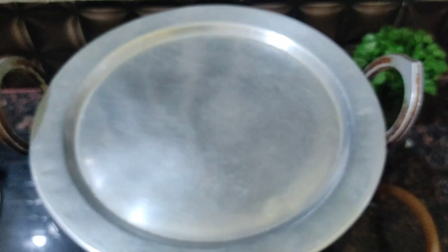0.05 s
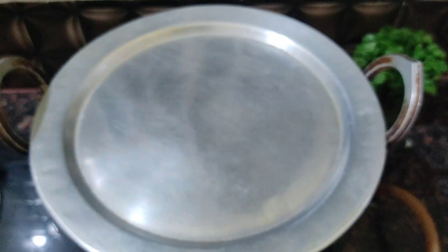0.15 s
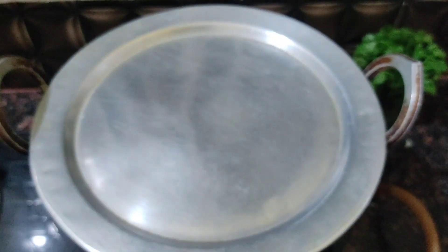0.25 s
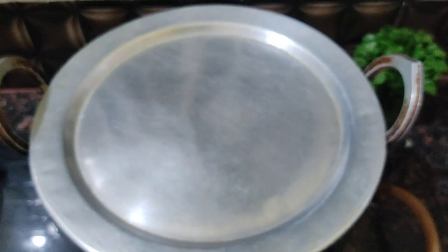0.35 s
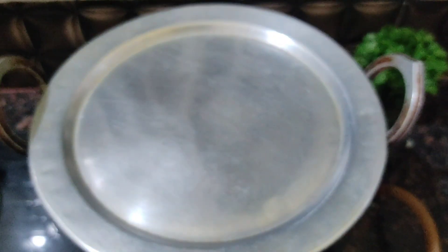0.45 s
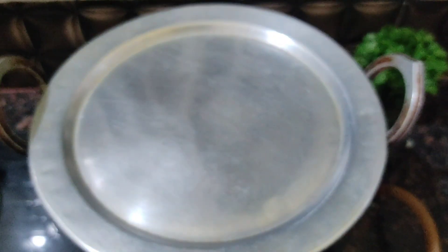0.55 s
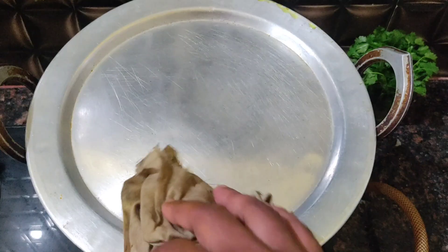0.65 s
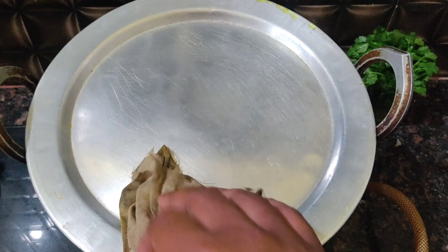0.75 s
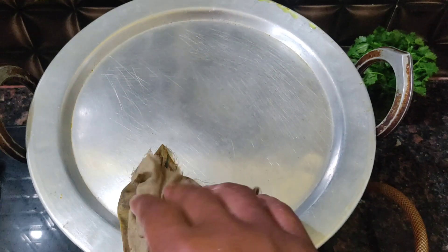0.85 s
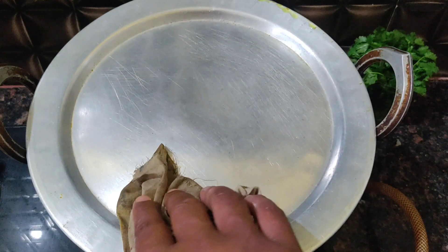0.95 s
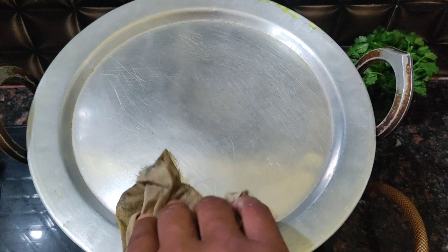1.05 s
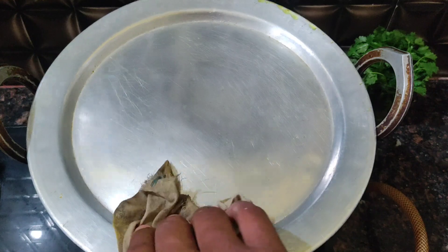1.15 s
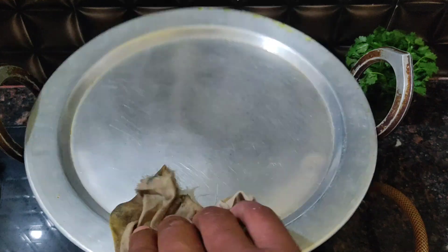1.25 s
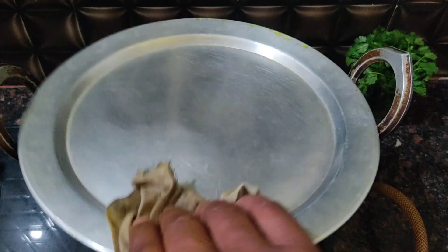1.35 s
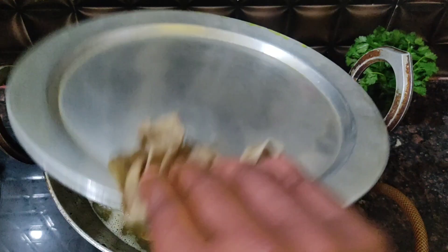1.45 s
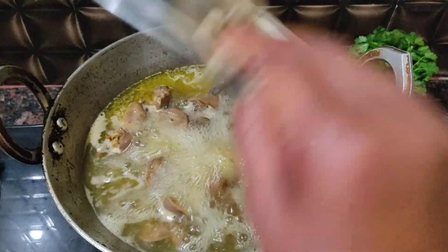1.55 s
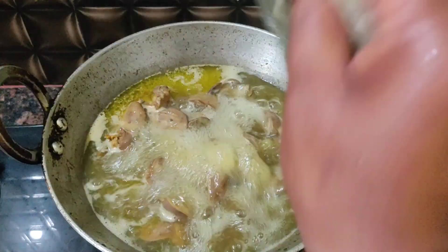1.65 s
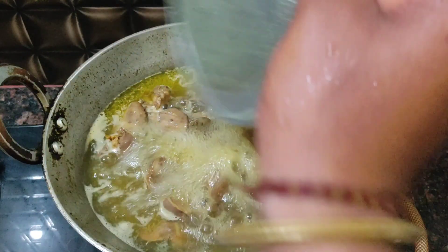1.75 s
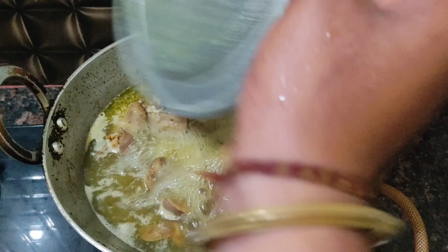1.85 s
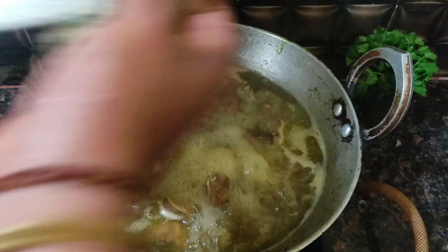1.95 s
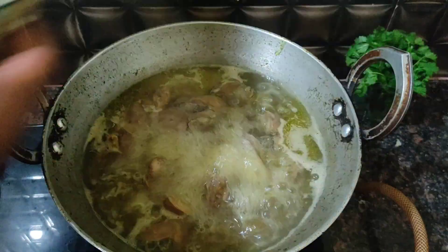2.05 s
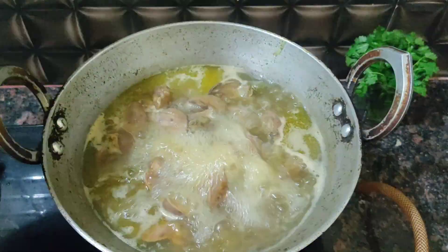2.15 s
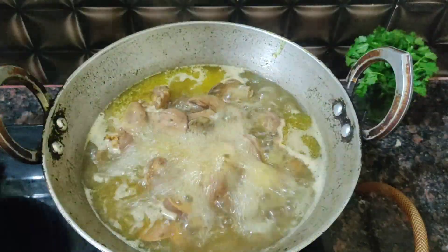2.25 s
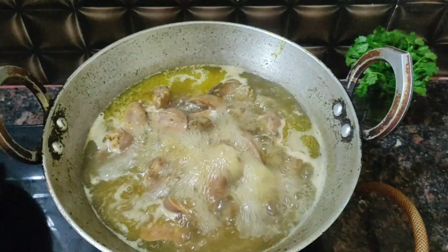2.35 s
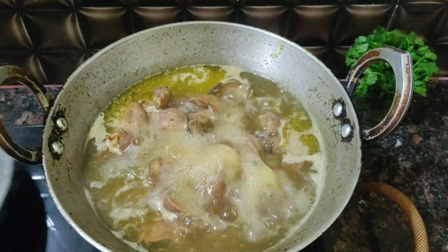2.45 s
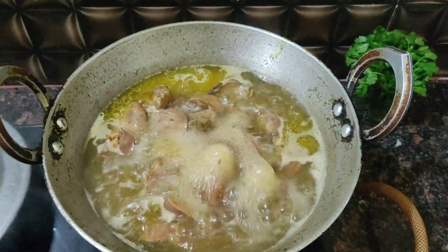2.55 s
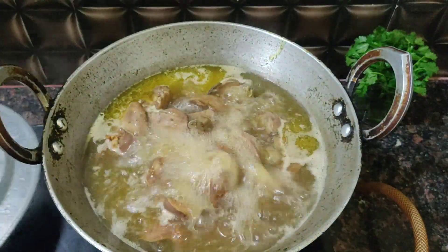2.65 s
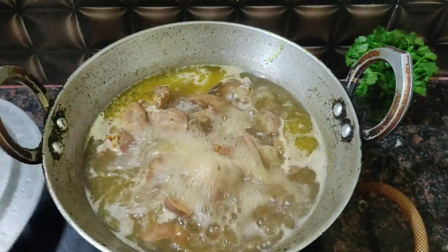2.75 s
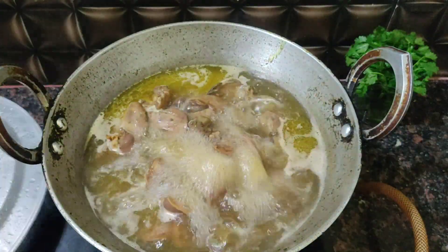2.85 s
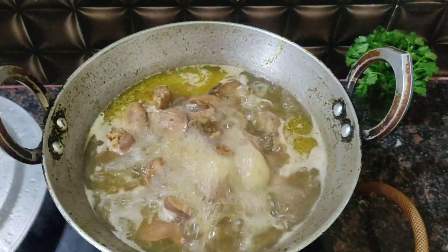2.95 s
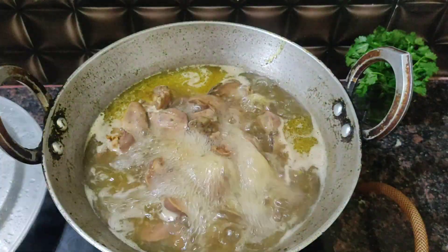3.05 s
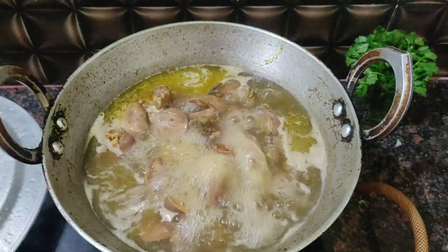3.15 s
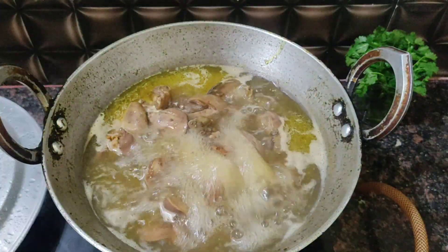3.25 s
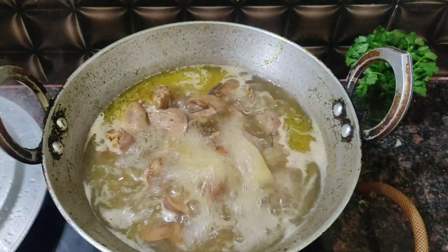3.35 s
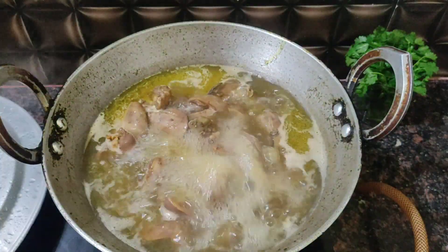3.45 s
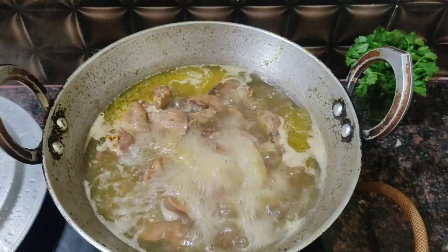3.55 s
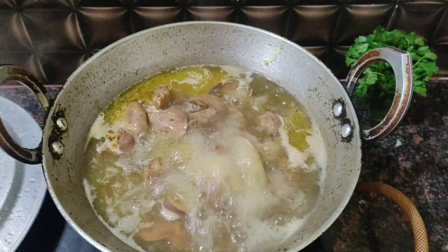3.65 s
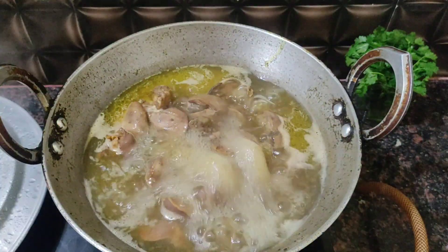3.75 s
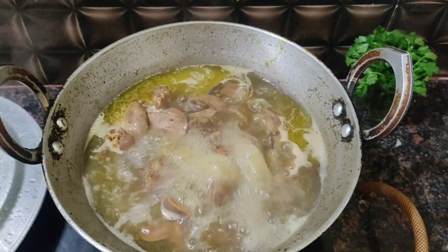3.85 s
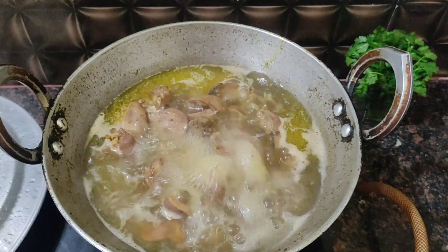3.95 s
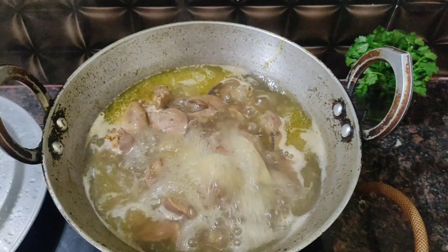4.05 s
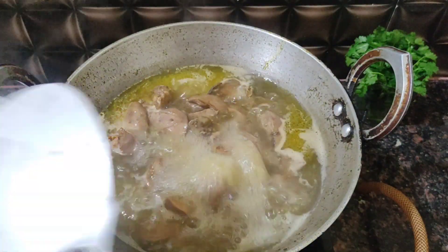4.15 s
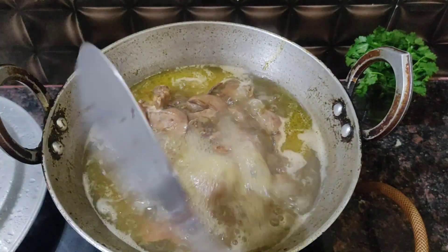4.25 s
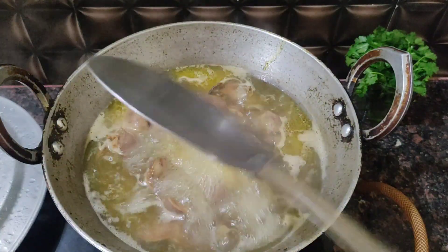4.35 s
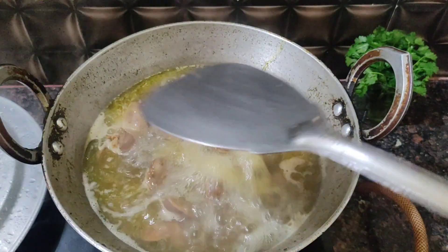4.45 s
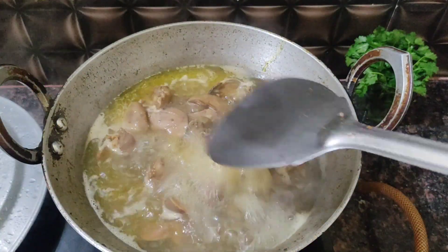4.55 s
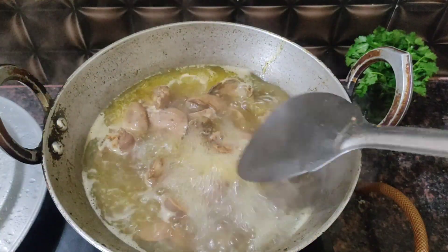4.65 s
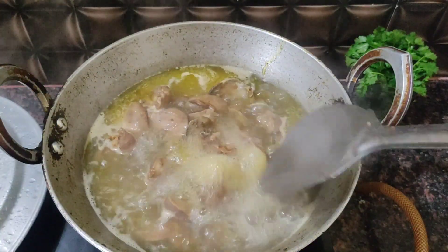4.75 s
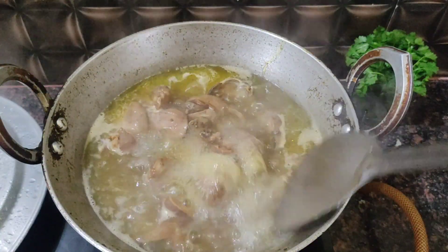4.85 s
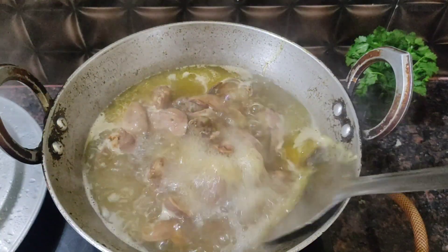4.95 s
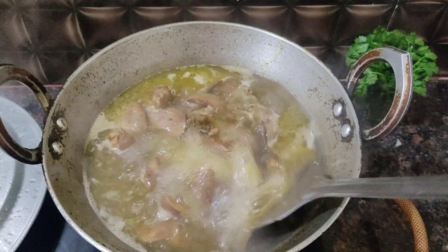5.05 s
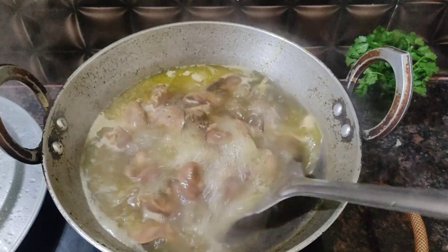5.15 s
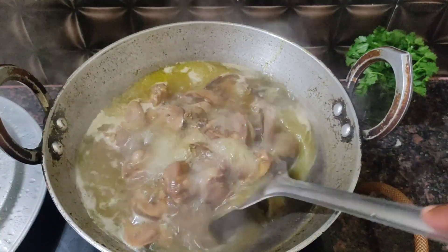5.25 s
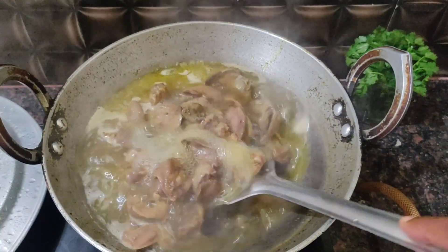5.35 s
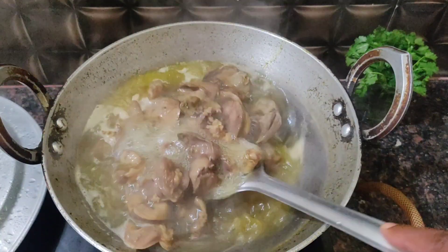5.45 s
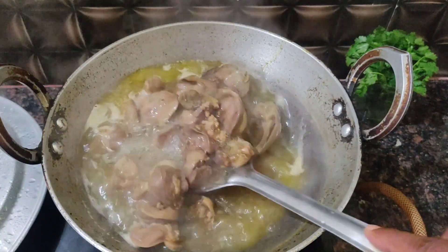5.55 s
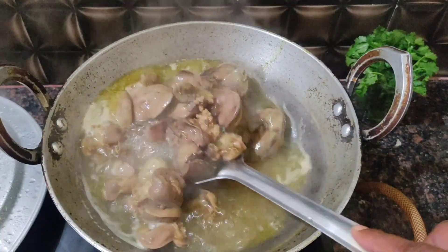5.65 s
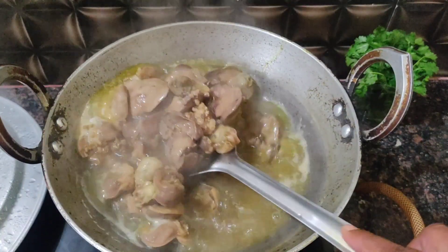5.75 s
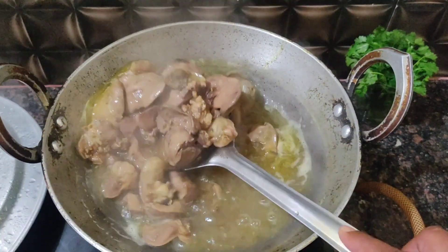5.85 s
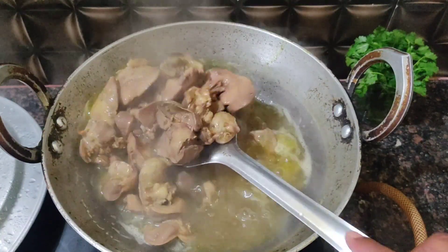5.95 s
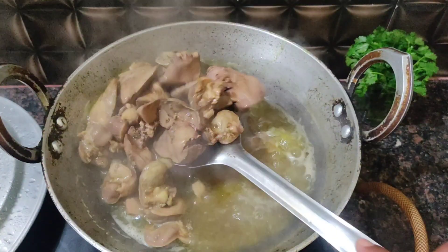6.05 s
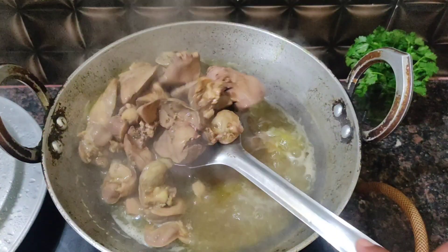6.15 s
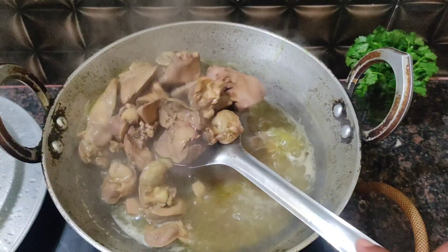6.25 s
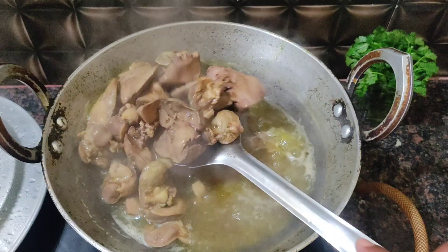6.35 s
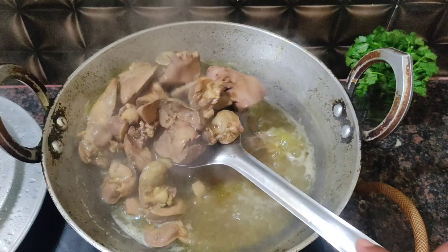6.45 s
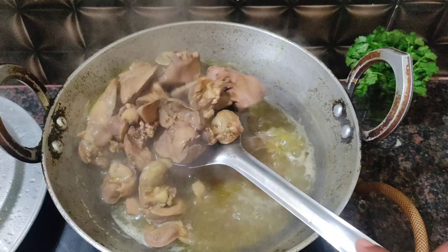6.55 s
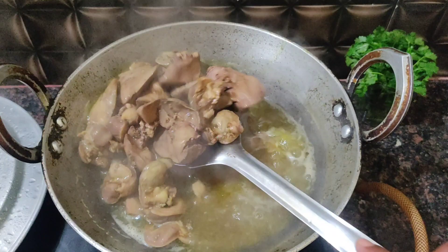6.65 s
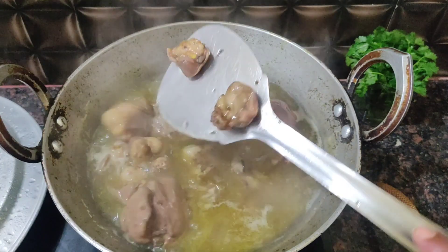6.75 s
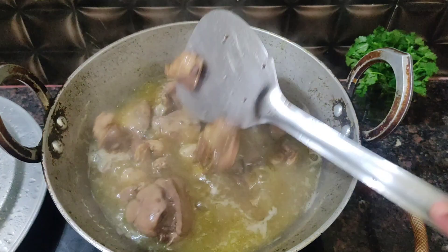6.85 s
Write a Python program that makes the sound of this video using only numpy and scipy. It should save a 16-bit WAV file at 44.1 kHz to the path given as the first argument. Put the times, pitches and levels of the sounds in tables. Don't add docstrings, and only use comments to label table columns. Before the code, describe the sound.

Muffled bubbling and soft burner hiss dip briefly to silence, then a thin metal lid clatters loudly on its pot. It rings as it is lifted, and clangs onto the counter, rattling to rest. Open broth boils, then a steel spatula knocks the pot and scrapes its bottom. Close stereo microphones in a small, hard kitchen.

```python
import sys
import numpy as np
from scipy import signal
from scipy.fft import rfft, irfft
from scipy.io import wavfile
from scipy.ndimage import uniform_filter1d

SR = 44100
rng = np.random.default_rng(int(sys.argv[2]) if len(sys.argv) > 2 else 0)


def output_pcm(signal):
    pcm = np.clip(np.atleast_2d(signal).T, -1, 1) * 32767
    wavfile.write(sys.argv[1], SR, np.round(pcm).astype(np.int16))


def boost(x):
    u = np.asarray(x, float) / 20
    return 10 ** u


N = 303408

# pitch_hz, correlation (-1 to 1)
PORT_LIKENESS = [(60, -0.57), (180, 1), (550, 0.43), (1650, -0.1), (4970, -0.33), (15000, 0.38)]


def evened(x):
    return x / np.sqrt(np.mean(x ** 2) + 1e-20)


def read(points, hz):
    f, value = np.transpose(points)
    return np.interp(np.log(hz + 1), np.log(f + 1), value)


def add(mix, start_s, sound):
    part = mix[:, round(start_s * SR):][:, :sound.shape[1]]
    part += sound[:, :part.shape[1]]


def panned(pan_db):
    return boost(np.array([[pan_db / 2], [-pan_db / 2]]))


def correlated(left, other, likeness):
    return likeness * left + np.sqrt(1 - likeness ** 2) * other


def turbulence(shape_db, patchy_db):
    hz = np.fft.rfftfreq(1024, 1 / SR)
    a, b, c, d, patch = rng.standard_normal((N // 256 + 5, 513, 5)).T
    patch = uniform_filter1d(patch, size=10, axis=0)
    patch = evened(uniform_filter1d(patch, size=12, axis=1))
    likeness = np.clip(read(PORT_LIKENESS, hz), -1, 1)[:, None]
    left = a + 1j * b
    z = np.array([left, correlated(left, c + 1j * d, likeness)])
    z *= boost(shape_db(hz)[:, None] + patchy_db * patch)
    return evened(signal.istft(z, nperseg=1024, noverlap=768)[1][:, :N])


def gas_hiss(level_db):
    # pitch_hz, density_db (per Hz)
    jet_colour = [(500, 1), (1000, -2.5), (1600, -5), (3380, -8.5), (5070, -9), (6690, -0.5), (8320, 0),
                  (9250, -6), (9800, -11.5), (14100, -19), (16000, -71.5)]
    return boost(level_db + 3.0) * turbulence(lambda hz: read(jet_colour, hz), 0.65)


def burner_spectrum_db(hz):
    # pitch_hz, density_db (per Hz)
    combustion = [(8.8, -33), (15, 10.5), (49, -7.5), (91, -5), (166, -10), (230, -0.5), (373, -14),
                  (500, -17), (650, -36), (1100, -120)]
    # pitch_hz, width_hz, level_db
    resonances = [(229.2, 17, 0.5), (329, 20.3, -1)]
    peaks = sum(boost(2 * db) / (1 + (2 * (hz - f) / w) ** 2) ** 2 for f, w, db in resonances)
    rumble = boost(2 * (read(combustion, hz) - 4.5)) * (hz < 600)
    return 10 * np.log10(rumble + peaks + 1e-12)


def stand_hum():
    # start_s, level_db
    jolts = [(.04, -61), (.7, -59), (.95, -53.5), (1.45, -51.5), (1.95, -68), (2.38, -60), (2.62, -41.5),
             (3.0, -56), (3.83, -61), (4.079, -75), (4.6, -72), (5.04, -56)]
    pitch_hz, wander_hz, rest_db = 91.2, 3.4, -73
    rise_s, t60_s = 0.043, 0.91
    wander = evened(uniform_filter1d(rng.standard_normal(N), size=4000))
    turns = np.cumsum(pitch_hz + wander_hz * wander) / SR
    hum = (1 + 0.23 * wander[::-1]) * np.sin(2 * np.pi * turns) * panned(2.1)
    swell = boost(rest_db)
    for start_s, level_db in jolts:
        since = np.maximum(np.arange(0, N, 64) / SR - start_s, 0)
        swell = swell + (1 - np.exp(-since / rise_s)) * boost(level_db - 60 * since / t60_s)
    return np.repeat(swell, 64)[:N] * hum


def burner_drone(level_db):
    shared, *own = rng.standard_normal((3, N))
    colour = boost(burner_spectrum_db(np.fft.rfftfreq(N, 1 / SR)))
    bands = irfft(rfft(shared + 0.59 * np.array(own)) * colour, N)
    return boost(level_db + 1.5) * evened(bands) + stand_hum()


def groan(t, swell):
    pitch_hz, level_db = 226, -57.5
    vibrato = 1.2 * np.sin(2 * np.pi * 9.0 * t)
    return boost(level_db) * swell * np.sin(2 * np.pi * pitch_hz * t + vibrato)


def bubble(hz, cycles, rise, size=1500):
    turns = np.arange(size) / SR * hz
    envelope = np.exp(-turns / cycles) * (1 - np.exp(-turns / 0.62))
    return np.sin(2 * np.pi * (turns + rise * turns ** 2)) * envelope


def broth(simmer_db):
    # start_s, peak_db, pitch_hz
    pops = [(0.201, -34.5, 626), (.674, -32.5, 630), (0.061, -46, 650), (1.94, -50, 610), (2.163, -42, 600),
            (2.259, -41, 1100), (2.326, -37.5, 463), (2.367, -38.5, 890), (2.505, -44, 575),
            (2.561, -43.5, 583), (4.687, -57, 420), (4.717, -58, 600), (4.826, -53, 630),
            (4.848, -49.5, 800), (4.937, -49.5, 510), (4.959, -49, 560)]
    # start_s, peak_db, pitch_hz
    rolling = [(3.356, -46, 824), (3.383, -49.5, 450), (3.458, -47.5, 800), (3.541, -56, 875),
               (3.559, -48, 689), (3.612, -62, 458), (3.692, -53, 1080), (3.727, -48.5, 556),
               (3.806, -43, 766), (3.877, -40.5, 457), (3.99, -46.5, 961), (4.049, -48.5, 910),
               (4.113, -52, 655), (4.136, -48, 440), (4.172, -52.5, 697), (4.243, -56, 603),
               (4.317, -66, 622), (4.357, -50.5, 840), (4.46, -54, 540), (4.483, -47.5, 550),
               (4.563, -61, 509), (4.578, -51, 560), (4.6, -46, 654)]
    # start_s, peak_db,
    # pitch_hz
    sloshes = [(4.6, -46, 1400), (4.619, -46.5, 1220), (4.625, -61, 1910), (5.426, -47.5, 1280),
               (5.554, -54, 1380), (5.75, -54, 1240), (6.016, -41.5, 860), (6.069, -57, 745),
               (6.086, -55, 444), (6.183, -51, 430), (6.21, -54, 440), (6.232, -50, 570)]
    pop_spread_db, fine_spread_db, clump_db = 8, 7, 7
    out, fine, kick = np.zeros((2, N)), np.zeros((2, N)), np.zeros(N)
    for start_s, peak_db, hz in pops + rolling + sloshes:
        pop = bubble(hz, 1.6, 0.024) + 0.5 * bubble(hz * 1.8, 1.4, 0.016)
        gains = boost(peak_db - 4.5) * panned(pop_spread_db * rng.uniform(-1.1, 1))
        add(out, start_s, gains * pop / abs(pop).max())
        kick[round(start_s * SR)] = boost(peak_db - 9.5)
    surge = signal.oaconvolve(kick, np.exp(-np.arange(6000) / SR / 0.02))[:N]
    strength = boost(1.37 * np.minimum(rng.exponential(1, N), 5)) * (rng.random(N) < 600 / SR)
    kind = rng.integers(0, 24, N)
    for k, hz in enumerate(np.geomspace(470, 1700, num=24)):
        one = signal.oaconvolve(strength * (kind == k), bubble(hz, 2.53, 0.027))[:N]
        fine += one * boost(-.4 * np.log2(hz / 500)) * panned(fine_spread_db * rng.standard_normal())
    clumps = uniform_filter1d(rng.standard_normal(N), size=1500)
    clumps = evened(uniform_filter1d(clumps, size=1500))
    simmer = boost(simmer_db - 10 + clump_db * clumps) + uniform_filter1d(surge, size=100)
    return out + simmer * evened(fine)


def scrape():
    # start_s, length_s, level_db, fall_db (over the stroke)
    drags = [(5.132, 0.2, -49.5, 0), (5.336, 0.35, -56.5, 1.5), (5.664, 0.067, -53, 7),
             (5.729, 0.15, -55.5, 7.5), (6.352, 0.12, -53, 16), (6.449, 0.11, -44.5, 28),
             (6.837, 0.048, -46, 13.5)]
    # start_s, peak_db,
    # pitch_hz, decay_cycles
    catches = [(5.074, -37, 2000, 4), (5.099, -36, 7500, 3), (5.19, -62, 4250, 4.1),
               (5.231, -43.5, 1300, 4.4), (5.255, -40.5, 2310, 4), (5.43, -60, 2400, 3.6),
               (5.496, -55.5, 2000, 6.1), (5.542, -40, 6500, 2.3), (5.619, -50, 4040, 9.2),
               (5.66, -51, 2610, 9.6), (5.664, -53, 3030, 5.1), (5.67, -49, 4000, 12),
               (5.69, -61, 3260, 6.7), (5.771, -38, 5970, 1.5), (5.804, -45, 7500, 3.8),
               (4.618, -52, 2020, 14), (4.648, -59, 2010, 25), (4.893, -54, 2780, 2.8)]
    # pitch_hz, density_db (per Hz)
    grit = [(180, -13), (300, -8), (593, -14), (1300, -7), (1840, -17), (2400, -11), (4670, -16),
            (7950, -6.5), (14500, -35), (16000, -43)]
    edge_s, squeaks_per_s, squeak_db = .03, 900, -7
    t, level, out = np.arange(N) / SR, np.zeros(N), np.zeros((2, N))
    for start_s, length_s, level_db, fall_db in drags:
        edges = np.clip(np.minimum(t - start_s, start_s + length_s - t) / edge_s + .5, 0, 1)
        level += edges * boost(level_db - fall_db * np.clip((t - start_s) / length_s, 0, 1))
    force = boost(3.2 * np.minimum(rng.exponential(1, N), 5))
    slips = 1 + .5 * force * (rng.random(N) < 260 / SR) * 5.3
    slips = signal.lfilter([.04], [1, -.96], slips ** 2) ** .5
    chance = rng.random((N, 4))
    for at in np.flatnonzero((chance[:, 3] < squeaks_per_s / SR) & (level > 0)):
        octaves, rarity, side = chance[at, :3]
        hz = 1500 * 2 ** (2.7 * octaves)
        one_db = squeak_db + read(grit, hz) + 13 - 2.8 * np.log(rarity + .05)
        gains = level[at] * boost(one_db) * panned(14 * (side - .5))
        add(out, at / SR, gains * bubble(hz, 3.7, 0, size=400))
    for start_s, peak_db, hz, cycles in catches:
        gains = boost(peak_db) * panned(10.0 * rng.uniform(-1.3, 1))
        add(out, start_s, gains * bubble(hz, cycles, 0))
    return out + boost(-3.0) * level * slips * turbulence(lambda hz: read(grit, hz), 1.5)


def low_modes(modes, tilt_db_per_octave, low_db, start_s, damping, wobble, t):
    beat_hz, beat_from_hz = 30.25, 460
    mode_hz, mode_db, mode_t60 = np.array(modes).T[:, :, None]
    phase, twin_hz, apart = rng.random((3, len(modes), 1))
    port = np.array([0, 1])[:, None, None]
    turns = mode_hz * (t + start_s) + 0.36 * phase + port * (apart - .2) * mode_hz / 1600
    twin = wobble * np.minimum(mode_hz / beat_from_hz, 1) ** 2
    beat = 1 + twin * np.cos(2 * np.pi * (beat_hz * (.3 + .7 * twin_hz) * t + apart))
    tilt_db = low_db + tilt_db_per_octave * np.log2(mode_hz / 600)
    decay = boost(mode_db + tilt_db - 60 * damping * t / mode_t60)
    return (decay * np.sin(2 * np.pi * turns) * beat).sum(1)


def upper_modes(shape, lines_db, damping, size):
    # pitch_hz, t60_s
    ring = [(150, 0.67), (600, 0.42), (2000, 0.42), (6000, 0.21), (12000, 0.38), (15000, 0.086)]
    thin_hz, thin_db = 1530, -2.5
    hz = np.fft.rfftfreq(size, 1 / SR)
    likeness = np.clip(read(PORT_LIKENESS, hz) * 1.47, 0, 1)
    a, b, c, d, lines = rng.standard_normal((len(hz), 5)).T
    left = a + 1j * b
    z = np.array([left, correlated(left, c + 1j * d, likeness)])
    groups = np.tanh(evened(uniform_filter1d(lines, size=12)))
    lines = lines_db * np.minimum(hz / thin_hz, 1 + hz / 16000) * groups
    crowd = evened(irfft(z * shape * boost(lines), size))
    f, frame_s, z = signal.stft(crowd, SR, nperseg=256)
    thinning_db = (thin_db / (1 + (f / thin_hz) ** 4))[:, None]
    decay_db = -60 * damping * frame_s / read(ring, f)[:, None]
    return signal.istft(z * boost(thinning_db + decay_db), SR, nperseg=256)[1]


def struck(blows, modes, colour, bright, lines_db, tick_db, wobble, size):
    out = np.zeros((2, N))
    t, hz = np.arange(size) / SR, np.fft.rfftfreq(size, 1 / SR)
    for start_s, peak_db, contact_s, damping, low_db in blows:
        bright_db = bright[0] + bright[1] * peak_db
        shape = boost(read(colour, hz) + bright_db * np.log2(hz / 1500 + 0.019))
        crowd = upper_modes(shape, lines_db, damping, size)
        low = low_modes(modes, bright_db, low_db, start_s, damping, wobble, t)
        rise = 1 - np.exp(-(t / (contact_s + .0001)) ** 1.5)
        fade = np.cos(np.pi / 2 * t / t[-1])
        tick = np.roll(irfft(shape * np.minimum(hz / 2500, 1), size), 24)
        tick *= np.minimum(t * SR / 24, 1) * (t < .01)
        tick *= boost(tick_db) / abs(tick).max() * 0.0018 / (contact_s + .0001)
        add(out, start_s, boost(peak_db - 12) * ((crowd + low) * rise * fade + tick))
    return out


def spatula_knocks():
    # start_s, peak_db, contact_s, damping_factor, low_modes_db
    knocks = [(4.6, -66, 0.002, 0.57, -2), (5.043, -15.5, 0.0013, 2.2, -26),
              (5.057, -20.5, 0.0017, 0.99, -31), (5.253, -32.5, 0.0038, 2, 0.5),
              (5.319, -33, 0.0023, 2.1, -11), (5.652, -40, 0.00035, 7.3, -18),
              (5.669, -57, 0.0011, 1.6, -19), (6.017, -55.5, 0.0016, 0.44, -11),
              (6.361, -42, 0.0019, 2.2, -8), (6.42, -19.5, 0.00036, 3.3, -12.5),
              (6.434, -27.5, 0.0025, 1.8, -19), (6.489, -43, 0.0013, 1.4, 5),
              (6.698, -55, 0.00055, 5.8, -20), (6.324, -53.5, 0.00046, 3.8, -21),
              (6.831, -29.5, 0.0047, 2.2, -7), (6.844, -42, 0.0015, 1.5, -5)]
    # pitch_hz, level_db, t60_s
    pot = [(317, -15.5, 1.6), (905, -2, 0.11), (980, 1, 0.16), (1100, -35, 0.22), (1300, -37, 0.25),
           (1605, -7.5, 0.53), (1460, -33, 0.3), (1830, -48, 0.41)]
    # pitch_hz, density_db (per Hz)
    steel = [(88, -30), (150, -13.5), (222, -11), (494, -11), (805, -1), (1190, -1.5), (1360, -12),
             (1870, -4.5), (2450, -8), (5150, -10.5), (8230, 2.5), (10800, -13), (15100, -26), (16000, -40)]
    pot_bright = (-0.57, 0.0036)
    return struck(knocks, pot, steel, pot_bright, lines_db=2.0, tick_db=11.0, wobble=1.0, size=12288)


def lid():
    # start_s, peak_db, contact_s, damping_factor, low_modes_db
    grabbed = [(0.696, -4, 0.00083, 0.94, -5), (0.712, -4, 0.001, 1.7, -9)]
    lifted = [(1.449, -2.5, 0.00056, 1.115, -7)]
    dropped = [(2.603, 1, 0.0022, 1.14, -15.5), (2.613, -7, 0.0016, 3.5, -15.5),
               (2.624, -4, 0.0033, 0.8, -16.5)]
    settled = [(2.925, -15.5, 0.0036, 0.97, -10.5), (2.936, -9.5, 0.0046, 1.7, -18.5),
               (2.947, -12, 0.0048, 1.06, -16.5), (2.968, -4, 0.0041, 1.3, -14.5),
               (2.984, -8, 0.017, 1.23, -11.5)]
    nudged = [(0.917, -13, 0.0018, 1.83, -8), (1.058, -28, 0.0032, 4, 1.5), (1.233, -25.5, 0.0017, 2.1, -7),
              (1.757, -23.5, 0.0055, 1.75, -7.5)]
    # pitch_hz, level_db, t60_s
    on_pot = [(184.6, -17.5, 0.29), (302.1, -13, 1.05), (326.7, -9, 1.5), (391.3, -16.5, 0.59),
              (570, -4, 0.36), (640, 1.5, 0.098), (691.3, -2, 0.37), (753, -1.5, 0.16), (870, -3, .15),
              (990, -7.5, 0.36), (1078, 1, .15), (1180, 3, 0.12), (1266, -2, 0.21), (1400, -16, 0.079)]
    in_hand = [(248.2, -15, 1), (310, -11.5, 0.5), (346.6, -13, 0.77), (437.7, -10.5, 0.45),
               (648, -7, 0.37), (697, -6.5, 0.21), (797, -7, 0.19), (890, -12, 0.22), (948, -5, 0.25),
               (1078, -0.5, 0.28), (1200, -8.5, 0.22), (1263, -7, 0.17), (1335, -25, 0.3),
               (1427, -1.5, 0.19)]
    on_stone = [(244.5, -6, 0.3), (323, -3, 0.28), (375.6, -8, 0.33), (440, -7.5, 0.44), (569, -10, 0.68),
                (649, -7, 0.93), (766, -3.5, 0.3), (831, 7, 0.25), (893, 0, 0.3), (990, -9, 0.4),
                (1060, -5, 0.32), (1198, -5, 0.72), (1316, -2, 0.32), (1500, -3, 0.42)]
    at_rest = [(200.2, -13, 0.64), (243, -9, 0.73), (325.2, -3, 0.52), (509, -11, 0.25), (622, 4, 0.22),
               (660, -11, 0.46), (746.5, -1, 0.27), (829, -8, 0.38), (906, 0.5, 0.31), (1077, 4.5, 0.42),
               (1195, -3, 0.5), (1306, -2, 0.42), (1416, -15, 0.27), (1540, -9, .25)]
    damped = [(555, 0.5, 0.24), (630, -1, 0.25), (689, -0.5, 0.14), (900, -7, 0.12), (1045, -9.5, 0.13),
              (1230, -1, 0.23), (1276, -5, 0.27), (1500, -13, 0.11), (180, -13, 0.16), (322, -5, 0.42)]
    # pitch_hz, density_db (per Hz)
    sheet = [
        [(47, -72), (80, -33.5), (217, -18.5), (316, -10.5), (461, -24), (563, -22), (877, -24), (1220, -11),
         (2220, -26.5), (8790, -14), (15000, -45.5), (16000, -83)],
        [(18, -74.5), (30, -54), (157, -29), (303, -8.5), (526, -23), (649, -0.5), (780, -10.5), (1280, -8),
         (1910, -26), (7870, -11), (14800, -40), (16000, -87.5)],
        [(47, -31), (80, -25), (163, -27), (232, -5), (687, -1), (858, 3.5), (1780, -10), (2540, -6.5),
         (3620, -12), (8410, -3.5), (14300, -33), (16000, -88)],
        [(47, -58), (80, -25), (136, -25), (323, -5), (422, -11.5), (615, -7.5), (980, -7), (1070, -1),
         (1740, -16), (7530, -16), (14300, -40), (16000, -116)],
        [(160, -36.5), (320, -7.5), (865, -13.5), (1180, -2), (1330, -10), (3070, -24.5), (8500, -13),
         (15300, -63), (16000, -88)],
    ]
    # tilt_db_per_octave at full strength, change per dB of peak level
    lid_bright = [
        (1.93, 0.6),
        (1.2, 0.59),
        (-0.06, -0.01),
        (0.8, 0.0269),
        (4, 0.3422),
    ]
    blows = [grabbed, lifted, dropped, settled, nudged]
    modes = [on_pot, in_hand, on_stone, at_rest, damped]
    states = zip(blows, modes, sheet, lid_bright)
    return sum(struck(*state, lines_db=5.0, tick_db=2.5, wobble=0.77, size=24576) for state in states)


def kitchen(x):
    # pitch_hz, t60_s
    room_decay = [(125, 0.51), (500, 0.62), (2000, 0.51), (6000, 0.5), (14000, 0.33)]
    taps = np.zeros((2, SR // 2 * 2))
    at = np.arange(160, SR - 20, 20) + rng.integers(0, 20, (2, (SR - 161) // 20))
    np.put_along_axis(taps, at, rng.choice([-1., 1.], at.shape), 1)
    hz, t, z = signal.stft(taps, SR, nperseg=256)
    likeness = np.clip(read(PORT_LIKENESS, hz), 0, 1)[:, None]
    z[1] = correlated(z[0], z[1], likeness)
    decay = boost(-60 * t / read(room_decay, hz)[:, None])
    tail = signal.istft(z * decay, SR, nperseg=256)[1]
    return signal.fftconvolve(x.mean(0)[None], tail / np.linalg.norm(tail[0]), axes=1)[:, :N]


def scene():
    # start_s, level_db
    boil = [(0, -0.5), (1.4, 2.5), (2.5, -2), (3.5, -0.5), (4.0, -4), (4.4, -6.5), (5.0, -7.5), (5.5, -2.5),
            (5.85, -12.5), (6.2, -7), (6.601, -7), (6.88, -19.5)]
    cut_s, lid_off_s = .53, 1.3
    t = np.arange(N) / SR
    boil_db = np.interp(t, *np.transpose(boil))
    knocks = lid() + spatula_knocks()
    bubbles = broth(-58.5 + boil_db)
    under_lid = signal.butter(4, 804, fs=SR, output="sos")
    muffled = boost(0.5) * signal.sosfilt(under_lid, bubbles)
    near = knocks + np.where(t < lid_off_s, muffled, bubbles)
    hiss = gas_hiss(-64.5 + 0.34 * boil_db - 4.5 * (t < cut_s))
    shake = np.sin(np.pi * np.clip((t - 5.66) / 0.3, 0, 1))
    low = burner_drone(-65 + 0.25 * boil_db + 7 * shake) + groan(t, shake)
    return boost(-3.5) * near + boost(-8.0) * kitchen(near) + scrape() + hiss + low


def top_cut(x):
    return signal.sosfilt(signal.butter(12, 16640, fs=SR, output="sos"), x)


def record(dry):
    # pitch_hz, gain_db
    capsule = [(9000, -0.5), (10500, -7.5), (12500, -7.5), (15000, 2.5), (15900, -7), (16500, -63.5)]
    # pitch_hz, left_minus_right_db
    lean = [(60, 5), (150, 3.5), (500, 4), (1200, 1.5), (2380, 1.4), (4800, -4), (8400, 2), (13000, 2.9)]
    # start_s, gain_db
    fade = [(0, -2), (.42, -1.5), (.495, -13.5), (.505, -60), (.55, -60), (.57, -23), (.63, -3.5), (.69, 6)]
    hz = np.fft.rfftfreq(N, 1 / SR)
    lean_db = read(lean, hz) / 2
    ports = irfft(rfft(dry) * boost(read(capsule, hz) + np.array([lean_db, -lean_db])), N)
    fade_db = np.interp(np.arange(N) / SR, *np.transpose(fade))
    return top_cut(np.tanh(ports) * boost(fade_db))


dry = scene()
out = record(dry)
output_pcm(out)
```